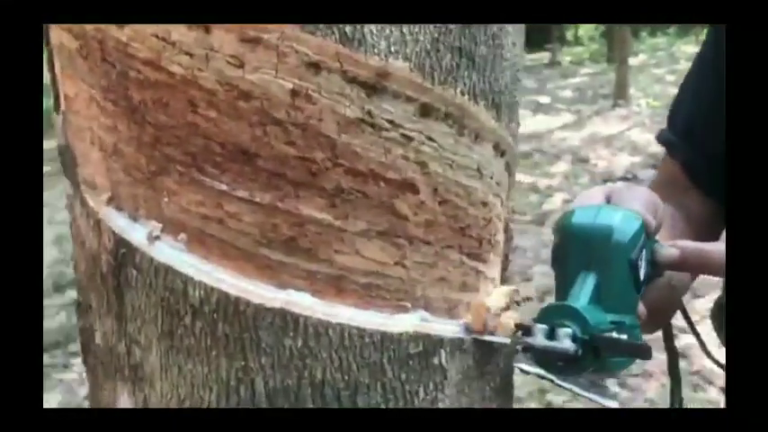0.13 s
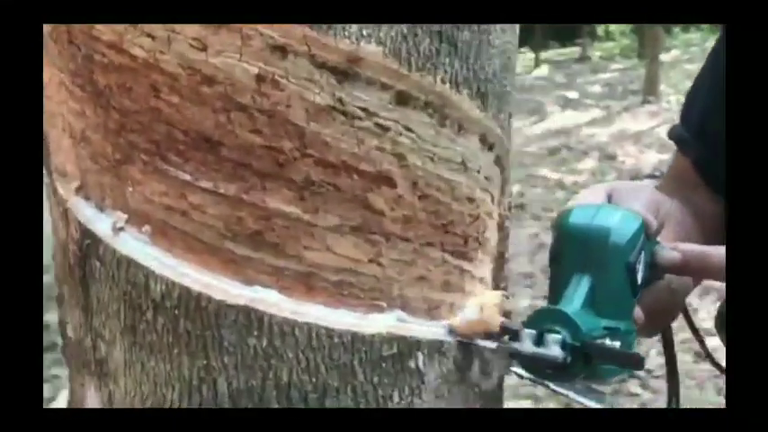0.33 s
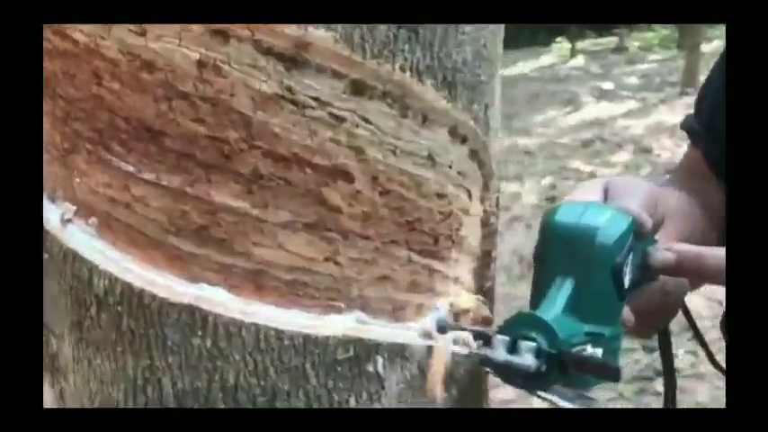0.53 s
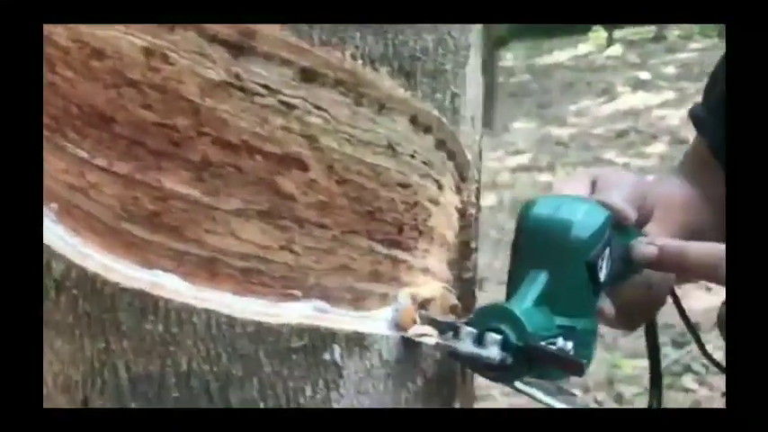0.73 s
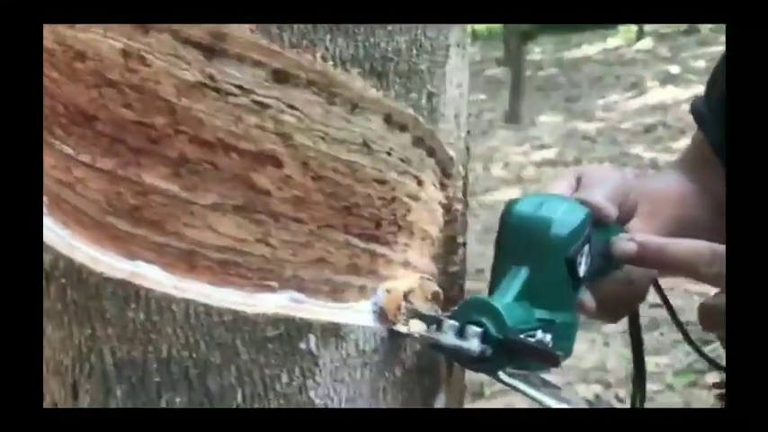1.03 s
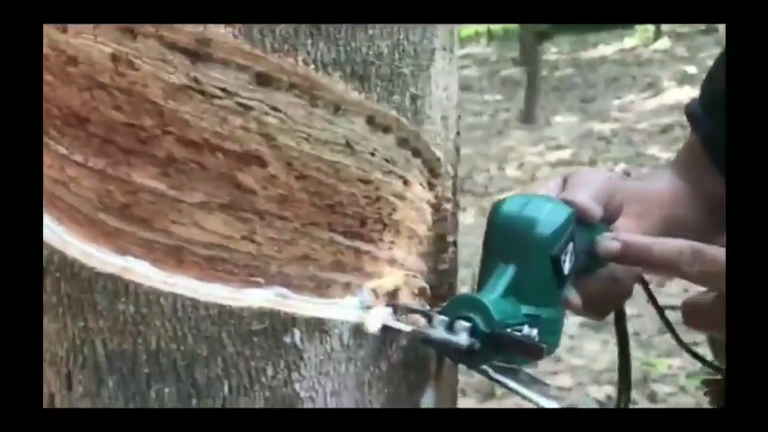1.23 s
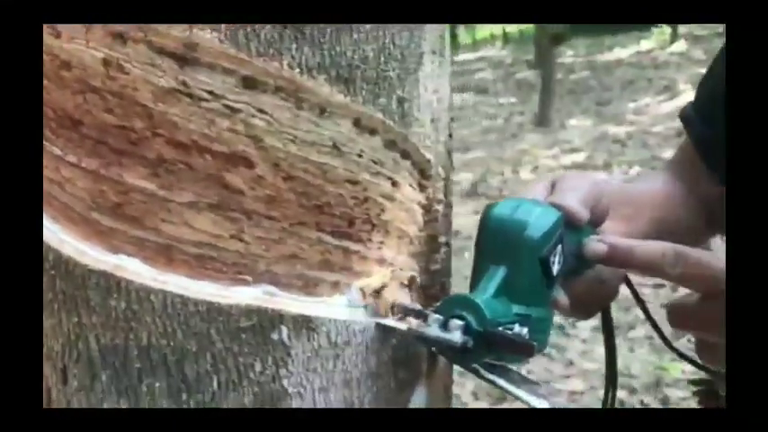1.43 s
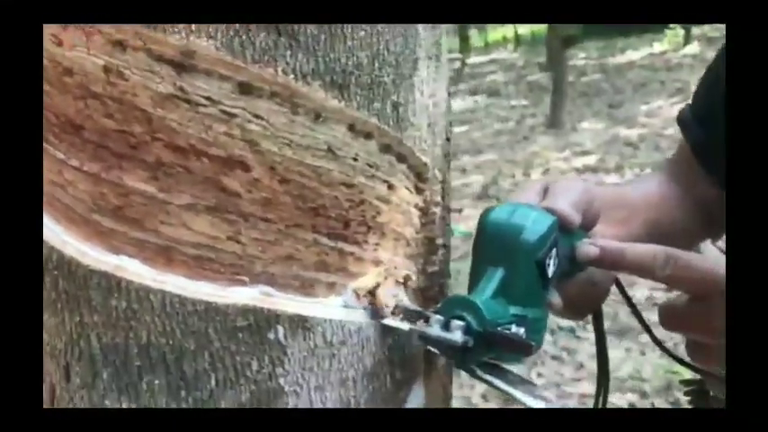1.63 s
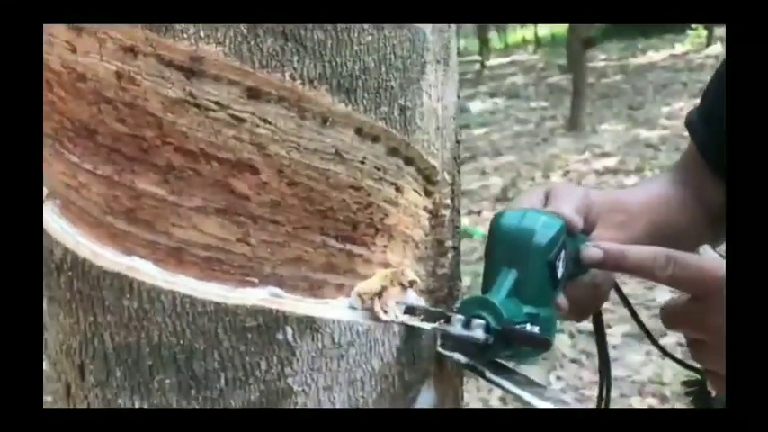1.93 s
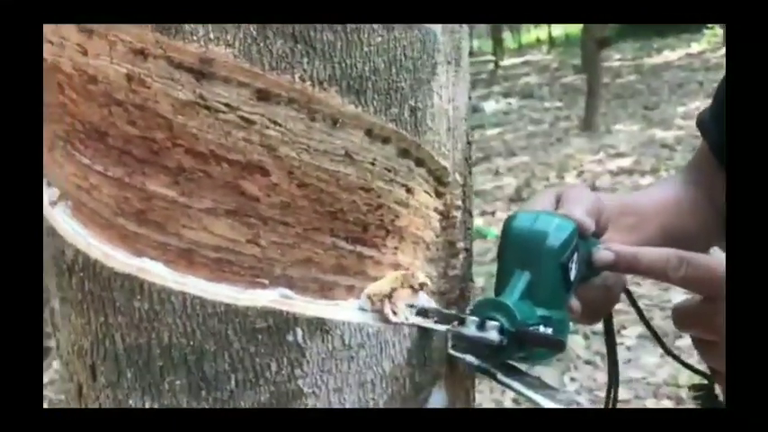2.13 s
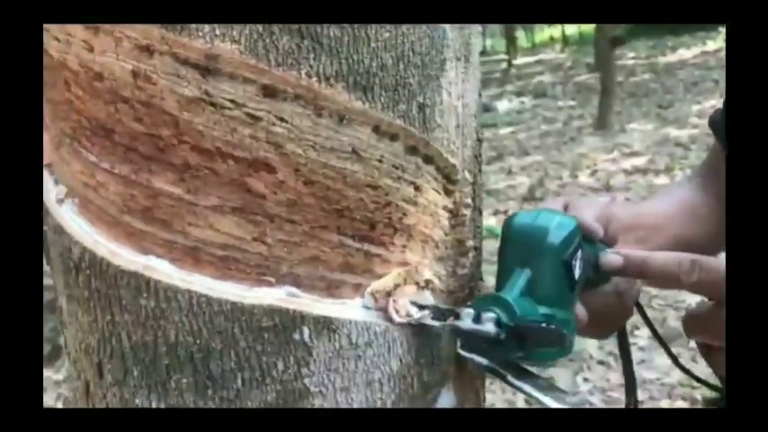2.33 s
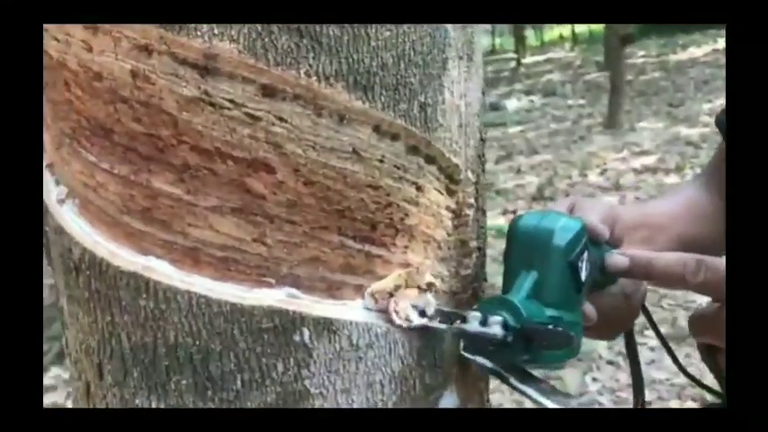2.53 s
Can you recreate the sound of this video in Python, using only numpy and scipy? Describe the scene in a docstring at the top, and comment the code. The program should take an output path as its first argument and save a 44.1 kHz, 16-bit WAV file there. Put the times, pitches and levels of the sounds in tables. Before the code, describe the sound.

An electric knife buzzes close by, its plastic housing rattling and steel blade chattering as it scrapes through tree bark. Midway the tone turns hollower, then a light woody knock sounds and the buzz quickens slightly, over faint outdoor rumble.

```python
"""An electric tapping knife shaves bark from a rubber tree, close by, over a low outdoor rumble.
From the start the blade shuttles about 77 times a second: at each end of the stroke the drive knocks
the plastic housing and the steel blade chatters, while the edge scrapes through the bark in between.
Near 1 s comes a soft bump of handling, then the housing rings more hollowly. At 1.9 s a light woody
knock sounds, and the buzz runs slightly faster to the end."""
import sys
import numpy as np
from scipy import signal
from scipy.fft import rfft, irfft, next_fast_len
from scipy.io import wavfile
from scipy.ndimage import map_coordinates

SR = 44100
rng = np.random.default_rng(int(sys.argv[2]) if len(sys.argv) > 2 else 0)


def int16_out(signal):
    """Quantize to a 16-bit WAV file."""
    q = np.round(np.clip(np.atleast_2d(signal).T, -1, 1) * 32767)
    wavfile.write(sys.argv[1], SR, q.astype(np.int16))


N = 119070
TIME_S = np.arange(N) / SR

# How fast the blade goes back and forth: time_s, cycles_per_s
BLADE_SPEED = [(0, 77.17), (0.5, 76.41), (1.1, 76.99), (1.75, 77.16), (1.95, 78.39), (2.15, 78.61),
               (2.25, 80.84), (2.36, 79.0), (2.7, 79.13)]


def knife():
    """The drive knocks the housing and shakes the blade at both ends of the stroke: push and pull."""
    # Force of the push knocks and of the pull knocks: time_s, relative_db
    push_force = [(0.01, -33.8), (0.11, -37.0), (0.14, -31.1), (0.22, -29.7), (0.29, -34.0), (0.32, -28.7),
                  (0.42, -38.8), (0.45, -33.7), (0.63, -29.7), (0.79, -30.6), (0.92, -35.4), (0.97, -30.3),
                  (1.0, -37.1), (1.05, -29.1), (1.16, -32.1), (1.23, -29.2), (1.31, -35.6), (1.47, -32.2),
                  (1.52, -28.1), (1.6, -31.7), (1.8, -30.3), (1.83, -33.8), (2.08, -32.6), (2.11, -28.9),
                  (2.24, -36.1), (2.26, -30.9), (2.29, -36.0), (2.31, -30.6), (2.39, -30.8), (2.44, -35.3),
                  (2.49, -30.4), (2.54, -35.6), (2.59, -31.3), (2.68, -39.6)]
    pull_force = [(0.01, -30.7), (0.4, -29.4), (0.46, -32.3), (0.56, -27.7), (0.64, -31.2), (0.72, -29.7),
                  (0.95, -32.8), (1.0, -27.9), (1.03, -32.3), (1.06, -27.5), (1.08, -31.1), (1.19, -28.7),
                  (1.21, -32.1), (1.29, -29.1), (1.32, -31.8), (1.68, -33.4), (1.73, -35.8), (1.83, -29.1),
                  (1.94, -35.8), (1.99, -29.7), (2.01, -38.3), (2.14, -29.8), (2.22, -37.1), (2.32, -28.6),
                  (2.44, -32.4), (2.52, -27.5), (2.54, -34.3), (2.57, -28.6), (2.6, -32.8), (2.69, -29.1)]
    # Tone of the steel blade: pitch_hz, push_gain_db, pull_gain_db
    blade_tone = [(3000, -32, -34), (4990, -14, -17.5), (5250, 2, -4), (6320, -1.5, 3.5), (7030, -4, -15.5),
                  (6900, -3, -9), (7680, -9, -23), (8020, 4, -5.5), (8680, 2.5, -12.5), (9590, 7, 8),
                  (10550, -9.5, 2.5), (10830, -5, 3.5), (11700, -8, -9), (12750, -3.5, -4), (13800, -8, 0),
                  (16100, -13, -7.5)]
    push_s, pull_s = stroke_ends()
    push_db, pull_db = at(push_force, push_s), at(pull_force, pull_s)
    housing = amp(-9) * housing_knocks(push_s, push_db, column=1)
    housing += amp(-8.5) * housing_knocks(pull_s, pull_db, column=2)
    # A harder push chatters more, a harder pull less.
    push_chatter = blade_chatter(push_s, 0.69 * (push_db - push_db.mean()))
    pull_chatter = blade_chatter(pull_s, -0.64 * (pull_db - pull_db.mean()))
    steel = amp(-45.5) * unit(colour(push_chatter, blade_tone, column=1))
    steel += amp(-45) * unit(colour(pull_chatter, blade_tone, column=2))
    return housing + hollow_ring(housing) + steel + blade_ring(push_chatter + pull_chatter)


def blade_cycles(first_push_s=.0081):
    """How many times the blade has gone back and forth since the first push."""
    return np.cumsum(at(BLADE_SPEED, TIME_S)) / SR - first_push_s * BLADE_SPEED[0][1]


def stroke_ends(push_jitter_s=.00003, pull_jitter_s=.00006):
    """Times of the push and pull knocks; the load of the cut shifts the pull within the cycle."""
    # Wait from push to pull: time_s, share_of_cycle
    pull_delay = [(0.01, 0.446), (0.09, 0.317), (0.19, 0.292), (0.22, 0.39), (0.42, 0.416), (0.66, 0.345),
                  (0.92, 0.464), (0.95, 0.365), (1.05, 0.33), (1.39, 0.426), (1.52, 0.385), (1.6, 0.479),
                  (1.88, 0.407), (1.96, 0.483), (2.19, 0.455), (2.26, 0.581), (2.29, 0.479), (2.34, 0.544),
                  (2.44, 0.523), (2.59, 0.458), (2.64, 0.575), (2.67, 0.538)]
    cycles = blade_cycles()
    count = int(cycles[-1]) + 1
    push_s = np.interp(np.arange(count), cycles, TIME_S)
    pull_s = push_s + at(pull_delay, push_s) / at(BLADE_SPEED, push_s)
    return (push_s + push_jitter_s * rng.standard_normal(count),
            pull_s + pull_jitter_s * rng.standard_normal(count))


def housing_knocks(times, force_db, column, rise_s=.00044, fade_s=.021, scatter_db=.73):
    """Each knock is one sharp blow on the plastic, then a brief rattle of loose parts."""
    # Tone of the housing: pitch_hz, push_gain_db, pull_gain_db
    housing_tone = [(255, -46.5, -52), (512, -40.5, -40.5), (816, -17, -13.5), (1157, -9, -10.5),
                    (1330, -19, -17.5), (1823, -10.5, -5), (2190, -2, -0.5), (2496, -8.5, -5),
                    (2860, -3, 1.5), (3338, 0, -1), (3580, -13, -16.5), (3964, -8, -20), (4410, -25.5, -32),
                    (6840, -39, -36.5)]
    t = TIME_S[:1024]
    rattle = amp(-60 * t / fade_s) * (1 - np.exp(-(t / rise_s) ** 2))
    knocks = amp(-7) * contacts(len(times), len(t), likeness=.922) * rattle / np.linalg.norm(rattle)
    knocks[:, 0] += 1  # the blow itself
    force = amp(force_db + scatter_db * rng.standard_normal(len(times)))
    blows = place(times, knocks * force[:, None])
    return np.sqrt(np.mean(force ** 2)) * unit(colour(blows, housing_tone, column))


def hollow_ring(knocks):
    """The knocks ring the housing's low notes, more strongly later in the cut."""
    # Loudness of the ring: time_s, level_db
    levels = [(0, -64), (.9, -68), (1.25, -48), (1.6, -49), (1.85, -47.5), (2.15, -48.5), (2.35, -48),
              (2.7, -48)]
    # Low notes of the housing: pitch_hz, fade_s (time to fall 60 dB), relative_db
    notes = [(924, 0.0092, 5), (1182, 0.013, -4.5)]
    dull_knocks = signal.sosfilt(signal.butter(4, 1400, fs=SR, output="sos"), knocks)
    ringing = sum(amp(db) * ring(dull_knocks, hz, fade_s) for hz, fade_s, db in notes)
    return amp(at(levels, TIME_S)) * unit(ringing)


def blade_chatter(times, force_db, width_s=.00029, fade_s=.011, scatter_db=1.35):
    """One clean tick of steel just ahead of each knock, in a cluster of contacts that thins out fast."""
    run_up_s, cluster_lead_s, tick_lead_s = .002, .00005, .0001847
    t = TIME_S[:1024] - run_up_s
    cluster = np.exp(-.5 * (t / width_s) ** 2)
    tail = (t > 0) * amp(-3 - 60 * abs(t) / fade_s) * (1 - np.exp(-abs(t) / width_s))
    tick = amp(13) * np.sinc((t + tick_lead_s) * SR)
    bursts = contacts(len(times), len(t), likeness=.7) * (cluster + tail) + tick
    force = amp(force_db + scatter_db * rng.standard_normal(len(times)))
    return place(times - run_up_s - cluster_lead_s, bursts * force[:, None])


def blade_ring(chatter):
    """The chatter rings the blade, more or less freely as the cut goes on."""
    # Notes of the blade: pitch_hz, fade_s
    notes = [(6160, 0.0081), (7200, 0.011), (8600, 0.0033), (11100, .002)]
    # Loudness of each note: time_s, first_db, second_db, third_db, fourth_db
    levels = [(0, -78, -56, -40, -74), (.12, -70, -54, -67, -60), (.38, -59, -56.5, -47.5, -57),
              (.65, -58, -47.5, -62, -51), (.88, -63, -66, -45, -52), (1.15, -80, -65, -63, -45.5),
              (1.42, -69, -63, -50.5, -60), (1.57, -55, -60, -75, -41.5), (1.72, -53, -64, -67, -45),
              (1.8, -54, -76, -54, -47.5), (2.22, -74, -81, -61, -54), (2.33, -50, -69, -50, -63),
              (2.7, -51, -62, -53.5, -78)]
    bright_chatter = np.gradient(np.gradient(chatter))
    return sum(amp(at(levels, TIME_S, column)) * ring(bright_chatter, hz, fade_s)
               for column, (hz, fade_s) in enumerate(notes, start=1))


def bark_scrape(swell_depth=.16):
    """The edge rasps through the bark, swelling with every stroke."""
    # Loudness of the scraping: time_s, level_db
    levels = [(0, -43), (.6, -42), (1.0, -42.5), (1.6, -42.5), (2.1, -44), (2.7, -46)]
    # Tone of the bark under the edge: pitch_hz, gain_db
    bark_tone = [(300, -25), (600, -18), (1000, -7.5), (2100, -3.5), (3200, 2), (4600, -16), (6000, -5.5),
                 (7300, -12), (9200, -4.5), (11000, -8.5), (15500, -9.5)]
    swell = 1 + swell_depth * np.cos(2 * np.pi * (blade_cycles() - .6))
    roughness = amp(0.5 * wobble(12) + 2.6 * wobble(900))
    rasp = swell * roughness * rng.standard_normal(N)
    return amp(at(levels, TIME_S)) * unit(colour(rasp, bark_tone))


def woody_knock(start_s=1.903, rise_s=.0034, gain_db=-42.5):
    """One light woody knock, half hidden by the buzz."""
    # Notes of the knock: pitch_hz, relative_db, fade_s
    notes = [(416, -11, 0.065), (600, -1.5, .05), (734, 1, 0.059), (1290, 4, 0.027)]
    t = np.maximum(TIME_S - start_s, 0)
    ringing = sum(amp(gain_db + db - 60 * t / fade_s) * np.sin(2 * np.pi * hz * t)
                  for hz, db, fade_s in notes)
    return (1 - np.exp(-t / rise_s)) * ringing


def handling_bump(peak_s=.99, width_s=.07, level_db=-63.5):
    """A soft bump of handling: low noise that swells and fades."""
    # Tone of the bump: pitch_hz, gain_db
    bump_tone = [(20, -30), (45, -16), (85, 0), (170, -6.5), (500, -45)]
    swell = np.exp(-.5 * ((TIME_S - peak_s) / width_s) ** 2)
    return amp(level_db) * swell * unit(colour(rng.standard_normal(N), bump_tone))


def outdoor_rumble():
    """Low outdoor noise that wavers gently."""
    # Loudness the rumble wavers around: time_s, level_db
    levels = [(0, -64), (.25, -62.5), (.45, -64.5), (.8, -60), (1.1, -61), (1.35, -67.5), (1.65, -61.5),
              (1.95, -63.5), (2.15, -64.5), (2.7, -63)]
    # Tone of the rumble: pitch_hz, gain_db
    rumble_tone = [(15, 2), (30, -1), (48, 1.5), (70, -3.5), (110, -13), (200, -14), (350, -21.5),
                   (700, -27.5), (3000, -34)]
    level_db = at(levels, TIME_S) + 1.2 * wobble(5.1)
    return amp(level_db) * unit(colour(rng.standard_normal(N), rumble_tone))


def amp(db):
    """Turn decibels into a factor to multiply by."""
    return 10 ** (np.asarray(db) / 20)


def unit(x):
    """Scale a sound to an average power of one."""
    return x / np.sqrt(np.mean(x ** 2) + 1e-20)


def at(table, times, column=1):
    """Read a table's column at the given times, sliding between rows."""
    table = np.asarray(table)
    return np.interp(times, table[:, 0], table[:, column])


def wobble(rate):
    """A smooth curve through `rate` random points a second."""
    points = rng.standard_normal(int(N * rate / SR) + 4)
    return map_coordinates(points, [TIME_S * rate])


def colour(x, tone, column=1):
    """Make each pitch of a sound louder or softer, as the tone table says."""
    size, tone = 2 * next_fast_len(N), np.asarray(tone)
    hz = np.fft.rfftfreq(size, 1 / SR)
    gain = amp(np.interp(np.log(hz + 1), np.log(tone[:, 0]), tone[:, column]))
    # Fold the filter so that it rings only after a hit, never before.
    cepstrum = irfft(np.log(gain), size)
    cepstrum[1:size // 2] *= 2
    cepstrum[size // 2 + 1:] = 0
    return irfft(rfft(x, size) * np.exp(rfft(cepstrum)), size)[:N]


def contacts(count, size, likeness):
    """One row of tiny random contacts per stroke, each like the one before (likeness 0 to 1)."""
    noise = rng.standard_normal((count + 1, size))
    fresh_share = np.sqrt(1 - likeness ** 2)
    return signal.lfilter([fresh_share], [1, -likeness], noise[1:], axis=0, zi=likeness * noise[:1])[0]


def place(times, bursts):
    """Add each short burst at its time, even between samples."""
    start, size = np.floor(times * SR), bursts.shape[1]
    fraction = (times * SR - start)[:, None]
    shifted = irfft(rfft(bursts) * np.exp(-2j * np.pi * np.fft.rfftfreq(size) * fraction), size)
    where = np.clip(start.astype(int)[:, None] + np.arange(size), 0, N)
    return np.bincount(where.ravel(), shifted.ravel(), N + 1)[:N]


def ring(hits, hz, fade_s):
    """Every hit sets off the same note, which falls 60 dB in fade_s."""
    t = TIME_S[:1024]
    note = np.sin(2 * np.pi * hz * t) * amp(-60 * t / fade_s)
    return unit(signal.fftconvolve(hits, note)[:N])


def scene():
    """Knife and bark close up, over the outdoor background, in one channel."""
    return (knife() + bark_scrape() + outdoor_rumble() + handling_bump() + woody_knock())[None]


def record(dry):
    """Cut away the very highest treble."""
    size, top_hz = 2 * next_fast_len(N), 15650
    below_top = np.fft.rfftfreq(size, 1 / SR) < top_hz
    return irfft(rfft(dry, size) * below_top, size)[:, :N]


dry = scene()
out = record(dry)
int16_out(out)
```